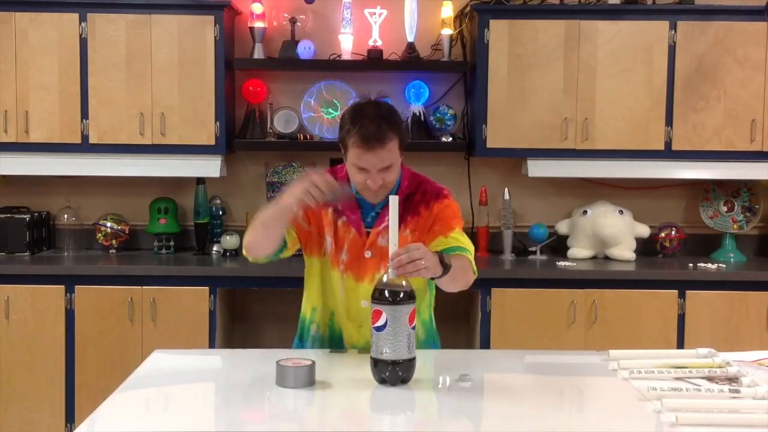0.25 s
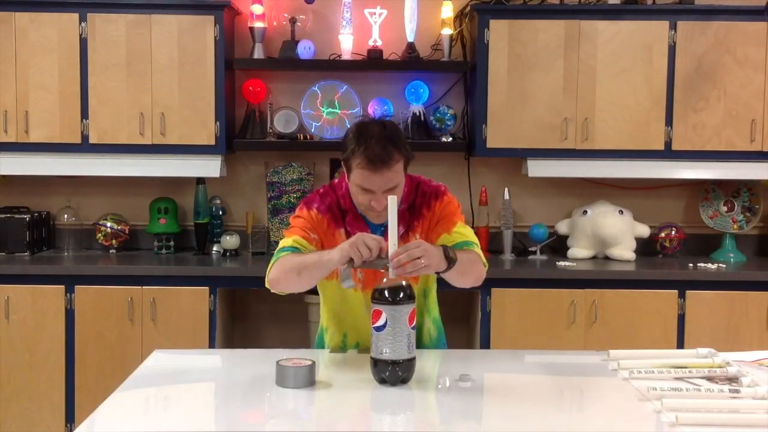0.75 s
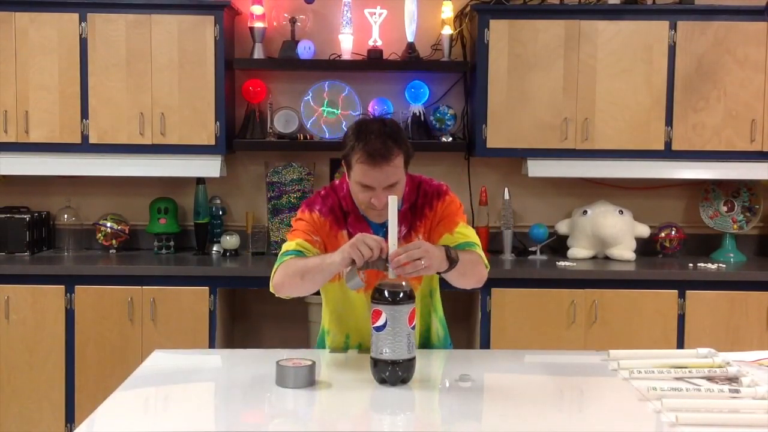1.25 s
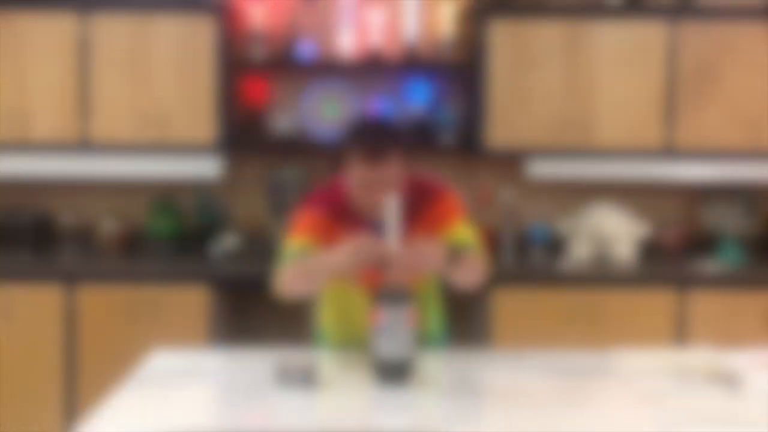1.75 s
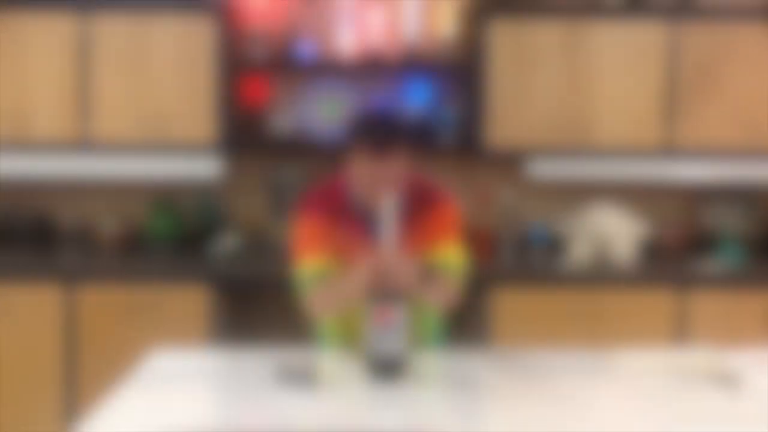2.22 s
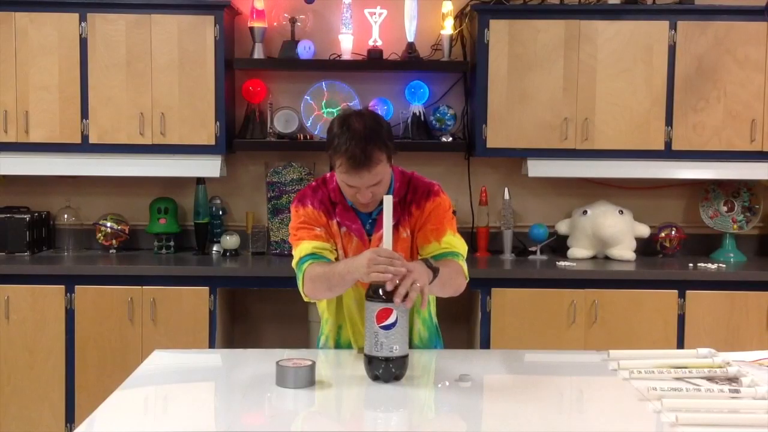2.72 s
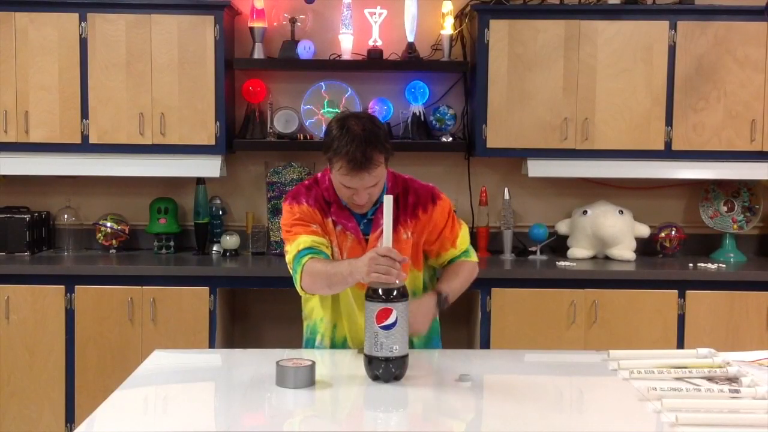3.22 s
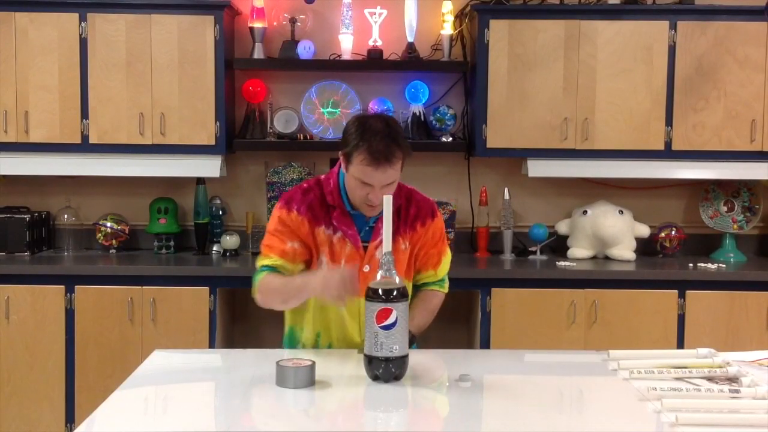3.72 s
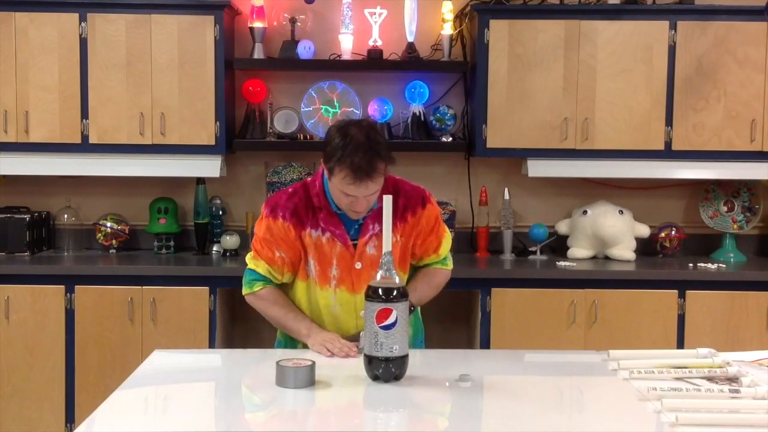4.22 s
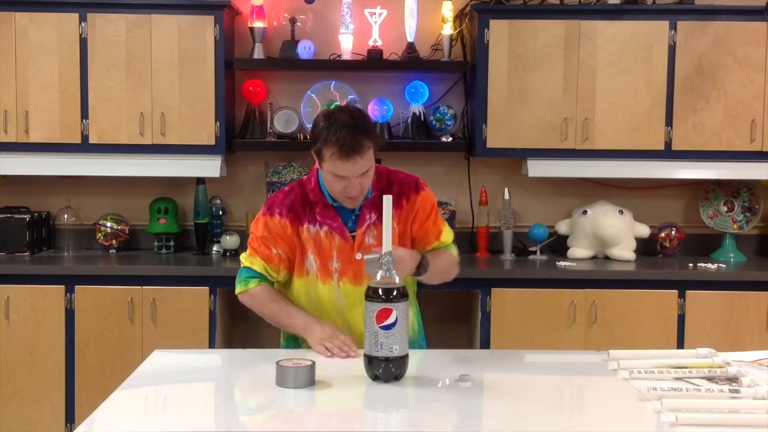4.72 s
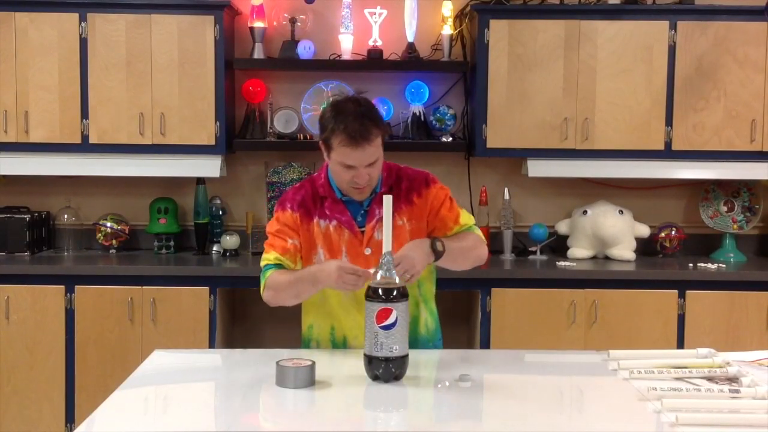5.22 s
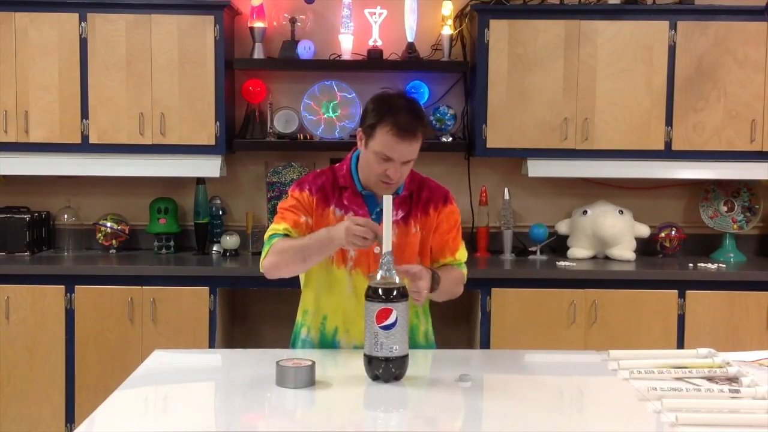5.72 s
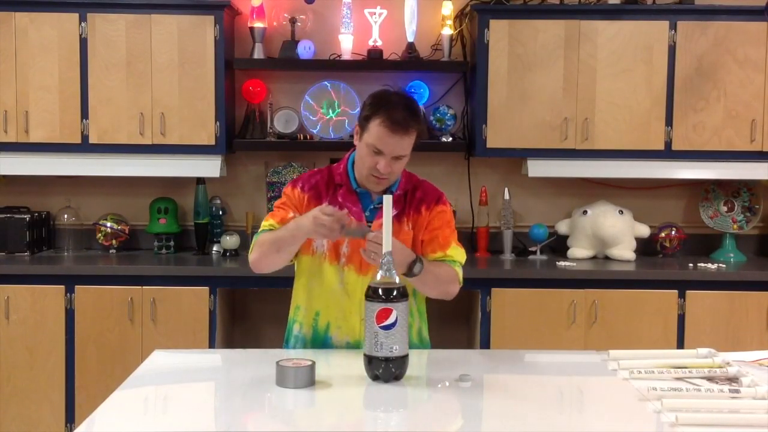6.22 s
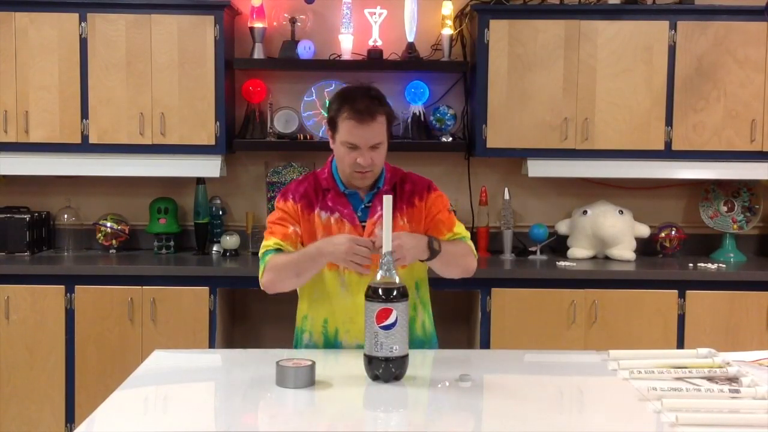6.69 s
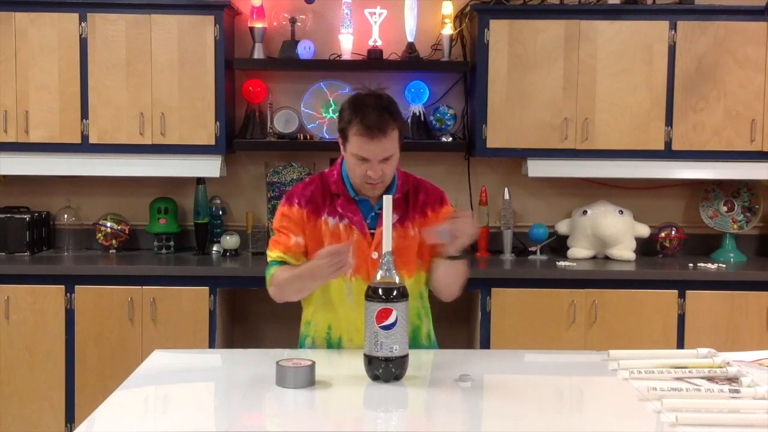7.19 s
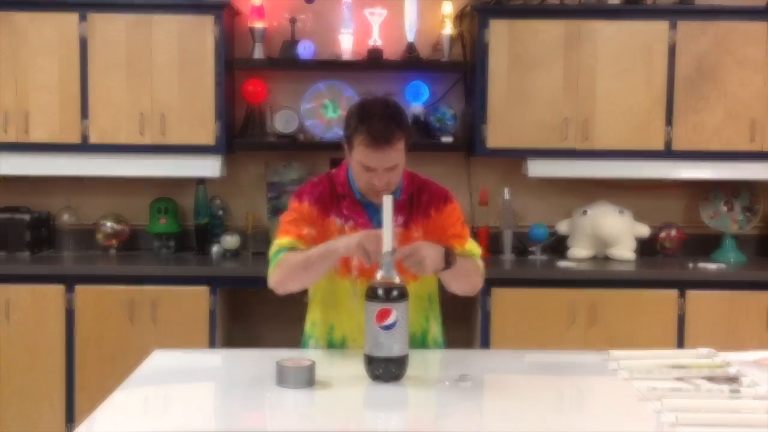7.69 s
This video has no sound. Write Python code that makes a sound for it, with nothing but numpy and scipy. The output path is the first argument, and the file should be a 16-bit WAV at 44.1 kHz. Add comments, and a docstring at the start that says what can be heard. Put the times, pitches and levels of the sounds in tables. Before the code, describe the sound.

In a hard-walled workroom, a steady two-tone lamp hum, soft ventilation and hiss run throughout. A dull table knock and faint sticky crackle open it, then mostly quiet with tiny ticks. After a second knock, duct tape rips off its roll in stuttering jerks. Finger peels and plastic ticks follow, then one fast zip and more handling, heard by one microphone in the room.

```python
"""A hard-walled workroom at one microphone, over lamp hum, quiet ventilation, hiss and a thin whistle.
It opens with a dull table knock and a sticky crackle; fingers peel and press tape and tick on plastic.
Near 2 s the background dips; past 4 s, after a second knock, duct tape rips off its roll in stick-slip jerks,
and the free strip rings lower as it grows. More peels and ticks follow; near 7.2 s a strip is whipped off
in one fast zip, with finger sounds after it. Noise through filters makes all but the hum, which is sines."""
import sys
import numpy as np
from scipy import signal
from scipy.fft import rfft, irfft, next_fast_len
from scipy.io import wavfile

SR = 44100
rng = np.random.default_rng(int(sys.argv[2]) if len(sys.argv) > 2 else 0)


def log_audio(samples):
    """Write samples as a 16-bit WAV file to the path given in sys.argv[1]."""
    # one column per channel
    frames = np.atleast_2d(samples).T
    # limit to full scale, then quantise
    limited = np.clip(frames, -1, 1)
    pcm = np.round(limited * 32767).astype(np.int16)
    wavfile.write(sys.argv[1], SR, pcm)


N = 350585
SIZE = 8192  # samples in one short sound
AGE_S = np.arange(SIZE) / SR
HZ = np.fft.rfftfreq(SIZE, 1 / SR)


def amp(db):
    """Decibels to gain."""
    return 10 ** (np.asarray(db) / 20)


def unit(x):
    """x at rms 1."""
    return x / np.sqrt(np.mean(x ** 2) + 1e-20)


def along(points, hz):
    """Read a (frequency, value) curve on a log frequency axis."""
    frequency, value = np.transpose(points)
    return np.interp(np.log(hz + 1), np.log(frequency), value)


def bump(hz, centre, width):
    """Gain of one resonance, 1 at its centre."""
    return hz * width / np.hypot(centre ** 2 - hz ** 2, hz * width)


def shelf(treble_db, corner_hz=4000):
    """Gain that lifts or lowers the treble."""
    return amp(treble_db * HZ ** 2 / (HZ ** 2 + corner_hz ** 2))


def coloured(x, gain):
    """A short sound through the minimum-phase (causal) filter that has this gain."""
    cepstrum = irfft(np.log(np.maximum(gain, 1e-6)))
    # Folding the cepstrum onto positive times makes the filter causal.
    cepstrum[1:SIZE // 2] *= 2
    cepstrum[SIZE // 2 + 1:] = 0
    return irfft(rfft(x) * np.exp(rfft(cepstrum)))


def noise(gain):
    """Steady noise of rms 1, shaped by a gain of frequency."""
    spectrum = rfft(rng.standard_normal(N))
    return unit(irfft(spectrum * gain(np.fft.rfftfreq(N, 1 / SR)), N))


def add(track, s, x):
    """Mix x into the track from time s, or from zero if s is negative."""
    start = max(round(s * SR), 0)
    track[start:start + len(x)] += x[:N - start]


def peel(force, rate, gain, scatter, size_db, drag_db, snap=0.00039):
    """Stick-slip peeling, rms 1 at full force: each slip sprays breaking glue threads, over a steady drag."""
    draw = rng.standard_normal((400, 2))
    gaps = np.exp(scatter * draw[:, 0]) / rate
    at = ((np.cumsum(gaps) - gaps[0]) * SR).astype(int) + 12  # first slip 12 samples in
    slips = np.bincount(at, amp(size_db * draw[:, 1]), SIZE)[:SIZE]
    snaps = signal.fftconvolve(slips, np.exp(-AGE_S / snap))[:SIZE]
    spray = unit(snaps) + amp(drag_db)
    threads = rng.choice([-1, 1], SIZE)  # each sample pushes or pulls at random
    x = coloured(force * spray * threads, gain)
    return x * np.linalg.norm(force) / np.linalg.norm(x)


RIP_SLIPS_PER_S, RIP_LET_GO_S = 650, 0.0012
CREEP_DB, CREEP_S = -9.5, .013  # after a jerk the tape creeps on and comes to rest
FIRST_RING_HZ, RING_WIDTH_HZ = 2930, 850
STRIP_DOUBLES_S = 0.075  # peeling time that doubles the free strip's length
# Jerks off the roll, levels direct at full force; the very short row at 4.501 s sounds as a faint tick: (start
# [s], length [s], level [dB], ring of the free strip [dB], treble [dB])
JERKS = [(4.2992, 0.0065, -32.5, 10.5, 3.5), (4.3258, 0.0085, -34.5, 6, 3.5), (4.341, 0.013, -34.5, 3, 6),
         (4.369, 0.0091, -32, 14, 5), (4.4274, 0.0086, -36.5, 4, 0), (4.501, 0.0016, -44.5, 5, -3),
         (4.55, 0.0059, -30.5, 12, 3), (4.561, 0.027, -33, 11, 5.5)]
# Tone colour of the roll: (frequency [Hz], relative level [dB])
ROLL_COLOUR = [(40, -54), (100, -19), (170, -9.5), (290, -0.5), (520, -5.5), (640, -4), (730, -3.5),
               (850, -2.5), (1000, -2.5), (2300, -6), (4000, -8.5), (7400, -12.5), (15000, -12.5)]


def rips():
    """The glue lets go in jerks, hardest as each first breaks; each lengthens the strip and lowers its ring."""
    out = np.zeros(N)
    breakaway = 1 + 0.2 * np.exp(-AGE_S / 0.00048)
    peeled_s = 0
    for s, length, db, ring_db, treble_db in JERKS:
        after = np.maximum(AGE_S - length, 0)
        let_go = np.exp(-after / RIP_LET_GO_S)
        creep = amp(CREEP_DB) * np.exp(-after / CREEP_S)
        force = breakaway * np.maximum(let_go, creep)
        # One pitch per jerk, from the strip's length halfway through it.
        ring_hz = FIRST_RING_HZ / (1 + (peeled_s + length / 2) / STRIP_DOUBLES_S)
        peeled_s += length
        ring = ring_db * bump(HZ, ring_hz, RING_WIDTH_HZ)
        gain = amp(along(ROLL_COLOUR, HZ) + ring) * shelf(treble_db)
        jerk = peel(force, RIP_SLIPS_PER_S, gain, scatter=.4, size_db=0.0, drag_db=-18)
        add(out, s, in_room(amp(db) * jerk, wet_db=-2.5))
    return out


def stroke(swell, fade):
    """A pull that peaks two swell times after its start, at half force one swell before and one fade after."""
    late = AGE_S - 2 * swell
    return np.exp(-(late / np.where(late < 0, swell, fade)) ** 2 * np.log(2))


ZIP_AT_S, ZIP_DB = 7.174, -32.5  # peak time; direct level at full force
ZIP_SWELL_S, ZIP_FADE_S, ZIP_SLIPS_PER_S = 0.011, 0.0092, 1400
# Tone colour of the taut strip: (frequency [Hz], relative level [dB])
STRIP_COLOUR = [(40, -52), (150, -25), (400, -8), (750, -15), (1100, -1.5), (1650, -6.5), (2600, -3),
                (3400, -4.5), (4500, -2.5), (7500, -7.5), (10000, -10.5), (15000, -10.5)]
# Resonances added to that colour: (frequency [Hz], width [Hz], level [dB])
STRIP_RESONANCES = [(1180, 360, -6), (2400, 420, -10), (3770, 99, 10), (5170, 74, 0), (6500, 140, 2.5)]


def zips():
    """A taut strip peels so fast that its slips run together into a rasp."""
    out = np.zeros(N)
    resonances = sum(amp(db) * bump(HZ, hz, width) ** 2 for hz, width, db in STRIP_RESONANCES)
    body = amp(along(STRIP_COLOUR, HZ)) * (1 + resonances)
    pull = stroke(ZIP_SWELL_S, ZIP_FADE_S)
    rasp = peel(pull, ZIP_SLIPS_PER_S, body, scatter=.4, size_db=2.5, drag_db=-8)
    add(out, ZIP_AT_S - 2 * ZIP_SWELL_S, in_room(amp(ZIP_DB) * rasp, wet_db=1.0))
    return out


PEEL_SWELL_SHARE = .42  # of the length; the rest is the fade
PEEL_SLIPS_PER_S, PEEL_REF_DB, DB_PER_DOUBLING = 1000, -60, 18  # a louder peel slips faster
# Fingers peeling and pressing tape; a peel whose swell would begin before zero peaks later:
# (peak time [s], length between half-force points [s], direct level at full force [dB], treble [dB])
FINGER_PEELS = [(.04, .09, -67, -4), (2.519, 0.089, -67, 4), (3.248, .055, -65.5, -7),
                (3.361, 0.015, -64, -1), (4.268, 0.11, -68, -2), (5.326, .016, -64, -3),
                (5.37, 0.021, -66.5, 10), (5.477, 0.063, -71, 10), (5.681, 0.021, -53, 5),
                (6.145, 0.04, -64, 5), (6.294, .01, -51, 5), (6.337, .016, -53.5, 2), (7.4, 0.025, -56, 4),
                (7.439, .018, -51, 6), (7.852, 0.022, -62, 14)]
# Tone colour of sticky tape: (frequency [Hz], relative level [dB])
STICKY_COLOUR = [(150, -24), (400, 2.5), (900, -4), (2200, -1), (5000, -5), (9000, -8), (15000, -7.5)]


def fingers():
    """Small sticky stick-slip crackles as the tape is lifted and pressed down."""
    out = np.zeros(N)
    for s, length, db, treble_db in FINGER_PEELS:
        swell = length * PEEL_SWELL_SHARE
        rate = PEEL_SLIPS_PER_S * 2 ** ((db - PEEL_REF_DB) / DB_PER_DOUBLING)
        gain = amp(along(STICKY_COLOUR, HZ)) * shelf(treble_db)
        crackle = peel(stroke(swell, length - swell), rate, gain, scatter=.5, size_db=3, drag_db=-10)
        add(out, s - 2 * swell, in_room(amp(db) * crackle, wet_db=0.0))
    return out


def blow(gain, life):
    """A dying contact noise, with the energy of rms 1 lasting one life."""
    x = coloured(rng.choice([-1, 1], SIZE) * np.exp(-AGE_S / life), gain)
    return x * np.sqrt(life * SR) / np.linalg.norm(x)


UPPER_MODE_DB = -7.5  # second mode of every tick, against its ring
# Tape and fingers on plastic:
# (time [s], direct level [dB], ring [Hz], broad snap against the ring [dB])
PLASTIC_TICKS = [(1.2644, -59.5, 1900, -8), (2.7596, -49, 3150, -15), (3.23, -52, 1830, -14),
                 (4.081, -56.5, 1610, -21), (5.669, -52, 3140, -14), (5.704, -58, 2270, -19),
                 (6.184, -58, 2730, -24), (6.295, -44, 6900, -11), (6.742, -59, 2610, -26),
                 (6.868, -56.5, 2300, -13), (7.384, -48.5, 3100, -5), (7.394, -47, 3000, -24),
                 (7.442, -48.5, 2370, -32), (7.6052, -44.5, 5530, -7.5)]


def ticks():
    """Light contacts on plastic: a broad snap and two damped modes each."""
    out = np.zeros(N)
    for s, db, ring_hz, snap_db in PLASTIC_TICKS:
        snap = amp(snap_db) * bump(HZ, 2500, 14000)
        ring = bump(HZ, ring_hz, 0.34 * ring_hz) ** 2
        upper = amp(UPPER_MODE_DB) * bump(HZ, 1.8 * ring_hz, 0.28 * ring_hz) ** 2
        tick = blow(ring + upper + snap, life=0.0021)
        add(out, s, in_room(amp(db) * tick, wet_db=-1.5))
    return out


# Dull knocks on the table: (time [s], direct level [dB], treble [dB])
TABLE_KNOCKS = [(0.001, -48, 5), (4.042, -51, 1)]
# Tone colour of the table: (frequency [Hz], relative level [dB])
TABLE_COLOUR = [(60, -37), (180, -15), (330, 4.5), (560, 2), (800, -6), (1400, -13), (2100, -16.5),
                (3500, -19), (8000, -26.5), (15000, -43)]


def knocks():
    """Short noise bursts coloured by the table's dull, low response."""
    out = np.zeros(N)
    for s, db, treble_db in TABLE_KNOCKS:
        gain = amp(along(TABLE_COLOUR, HZ)) * shelf(treble_db, corner_hz=1500)
        add(out, s, in_room(amp(db) * blow(gain, life=0.0041), wet_db=4.5))
    return out


# Room response: (frequency [Hz], time to decay by 60 dB [s])
ROOM_DECAY = [(150, 0.48), (700, 0.44), (2000, 0.4), (5000, 0.39), (9000, 0.35), (15000, 0.27)]


def in_room(x, wet_db, early_db=-8, early_life=0.0098, gap=0.0029):
    """x with its scatter off the table top and nearby things, then the diffuse answer of the room."""
    # wet_db and early_db weigh room and scatter energy against the direct sound.
    hz, t, z = signal.stft(rng.standard_normal(int(SR * .7)), SR, nperseg=256)
    decay = amp(-60 * t / along(ROOM_DECAY, hz)[:, None])
    tail = signal.istft(z * decay, SR, nperseg=256)[1]
    age = np.arange(len(tail)) / SR
    tail *= 1 - np.exp(-(age / gap) ** 2)  # the room answers after a short gap
    early = rng.standard_normal(len(age)) * np.exp(-age / early_life)
    response = amp(wet_db) * tail / np.linalg.norm(tail)
    response += amp(early_db) * early / np.linalg.norm(early)
    response[0] += 1  # direct sound
    return signal.fftconvolve(x, response)


# Lamp hum before the background gain: (frequency [Hz], rms level [dB])
LAMP_HUM = [(119.9, -77), (239.8, -77), (359.7, -57.5), (479.6, -63), (719.4, -83), (839.3, -88.5)]


def lamp_hum(t):
    """Electric lamps hum on steady mains harmonics, two of them well above the rest."""
    hum = 0
    for hz, db in LAMP_HUM:
        hum = hum + amp(db) * np.sqrt(2) * np.sin(2 * np.pi * (hz * t + rng.random()))
    return hum


# Tone colour of the ventilation: (frequency [Hz], relative level [dB])
VENT_COLOUR = [(25, -34), (70, -23.5), (115, -4.5), (180, 2), (240, 0), (310, -2.5), (420, -7.5),
               (600, -11), (750, -17.5), (1100, -20.5), (3000, -40)]


def ventilation():
    """Air moving through the ventilation, as steady low noise."""
    return noise(lambda hz: amp(along(VENT_COLOUR, hz)))


# Tone colour of the hiss: (frequency [Hz], relative level [dB])
HISS_COLOUR = [(410, -54), (700, -6.5), (968, -7), (1180, -8), (1780, -8), (3190, -10.5), (3770, -11),
               (4190, -11.5), (11400, -11.5), (13800, -10), (15500, -11.5)]


def hiss():
    """Broad steady noise."""
    return noise(lambda hz: amp(along(HISS_COLOUR, hz)))


def whistle():
    """A thin whistle: noise through one narrow resonance."""
    return noise(lambda hz: bump(hz, 3790, 280) ** 2)


# Background gain, which dips briefly and holds its end values outside: (time [s], level [dB])
BACKGROUND_GAIN = [(1.72, -3), (2.08, -6.5), (2.2, -6), (2.5, -3)]


def background():
    """Hum, ventilation and whistle under one gain curve, with hiss following it less deeply."""
    t = np.arange(N) / SR
    gain_db = np.interp(t, *np.transpose(BACKGROUND_GAIN))
    # These levels are rms before the gain curve.
    room_tone = lamp_hum(t) + amp(-65.0) * ventilation() + amp(-79.5) * whistle()
    return room_tone * amp(gain_db) + amp(-66.5) * hiss() * amp(0.61 * gain_db)


def scene():
    """All sources at one microphone."""
    return (rips() + zips() + fingers() + ticks() + knocks() + background())[None]


TOP_HZ = 15450


def record(dry):
    """The recorder keeps nothing above its band limit."""
    size = next_fast_len(N + SIZE)
    keep = np.fft.rfftfreq(size, 1 / SR) < TOP_HZ
    return irfft(rfft(dry, size) * keep, size)[:, :N]


dry = scene()
out = record(dry)
log_audio(out)
```